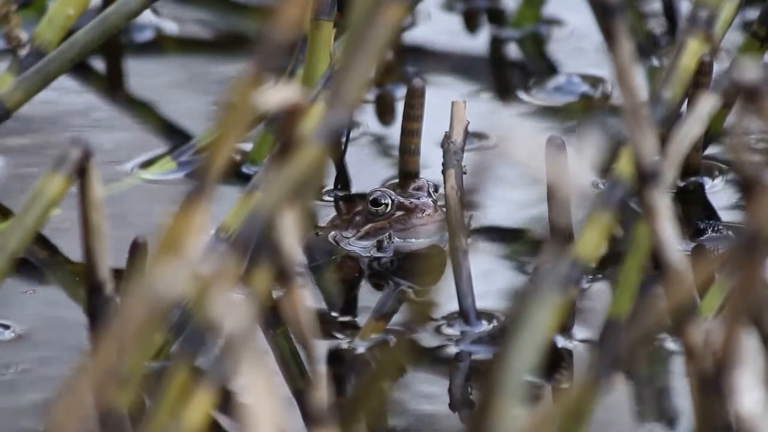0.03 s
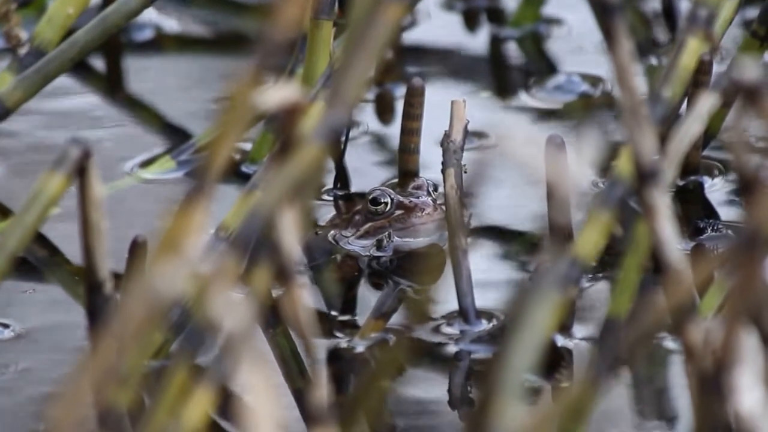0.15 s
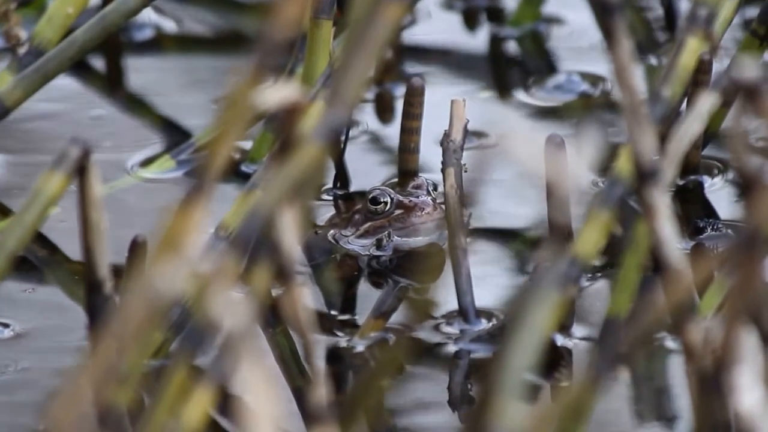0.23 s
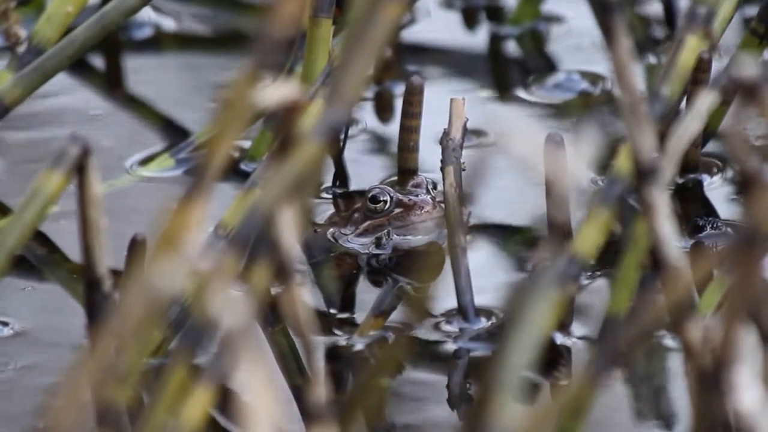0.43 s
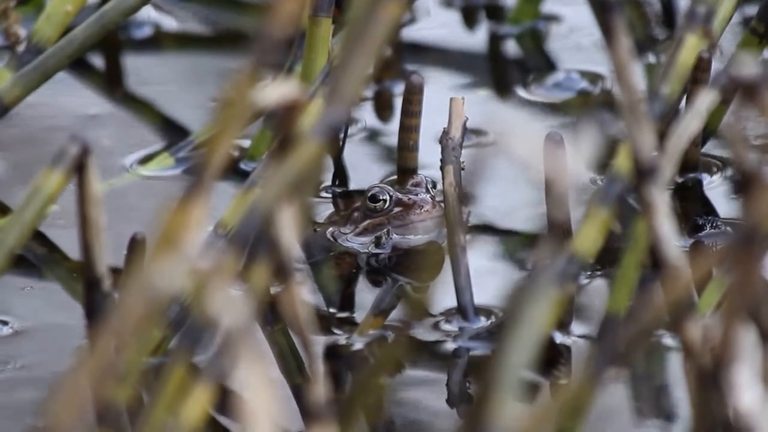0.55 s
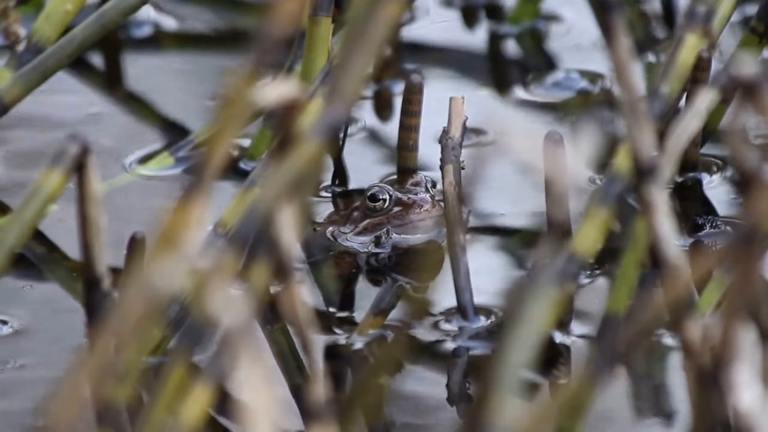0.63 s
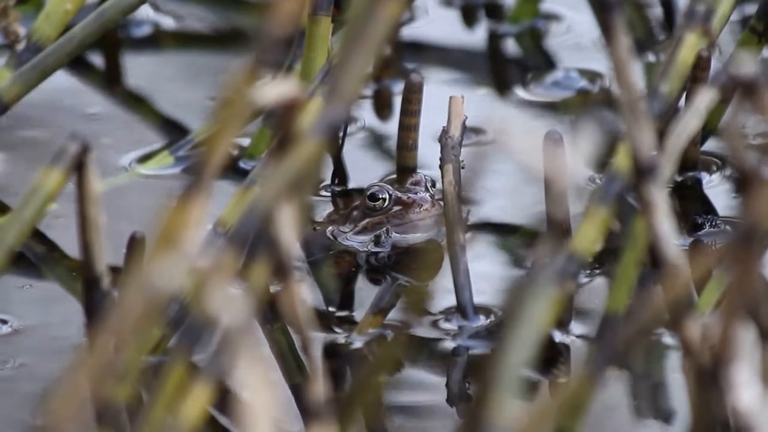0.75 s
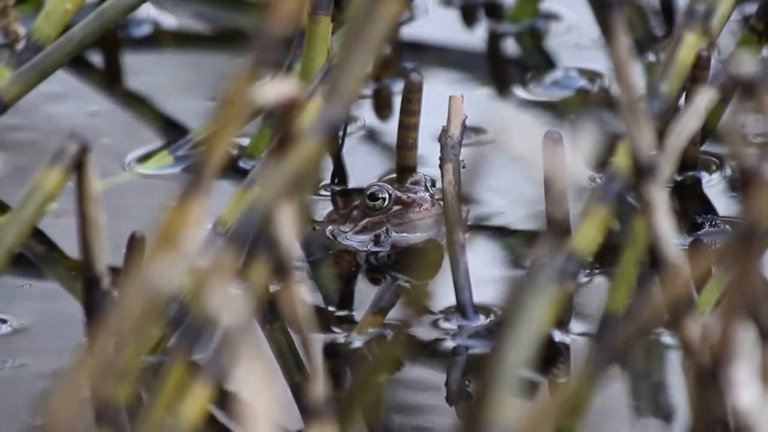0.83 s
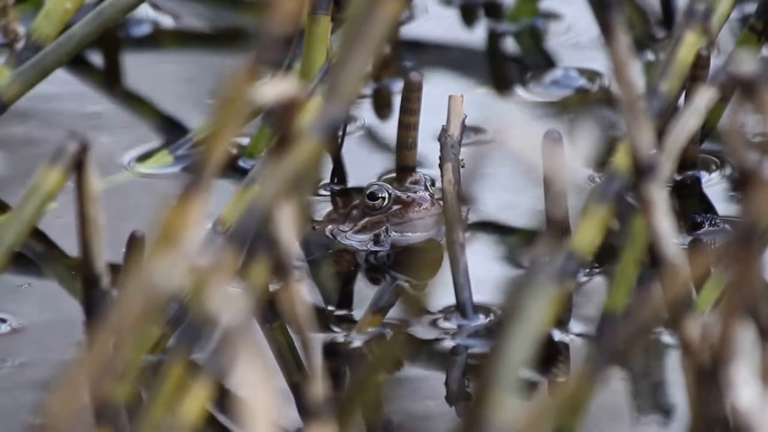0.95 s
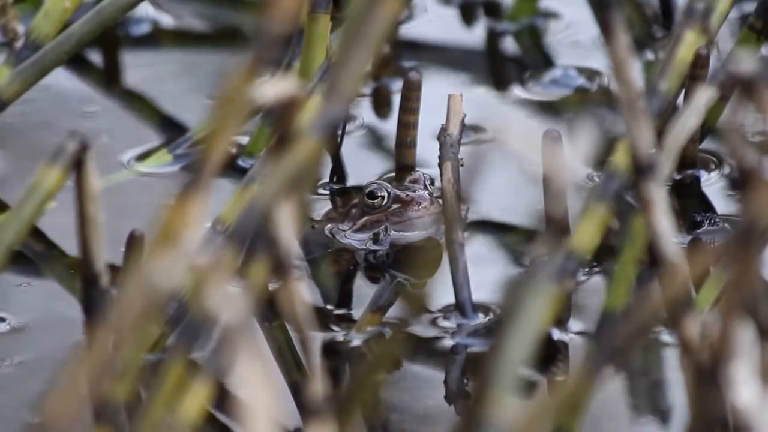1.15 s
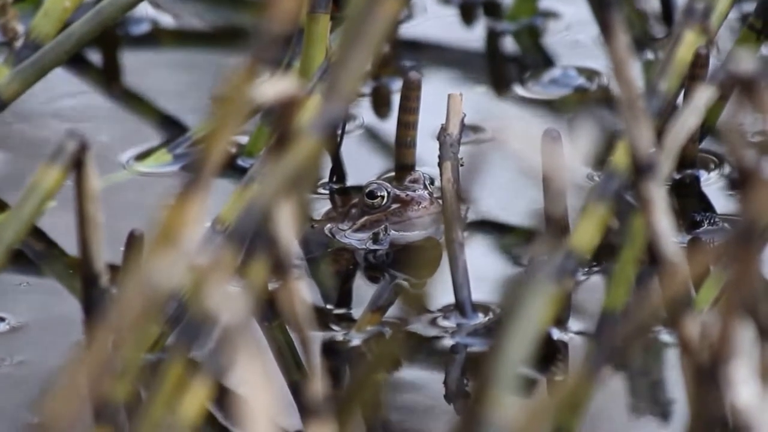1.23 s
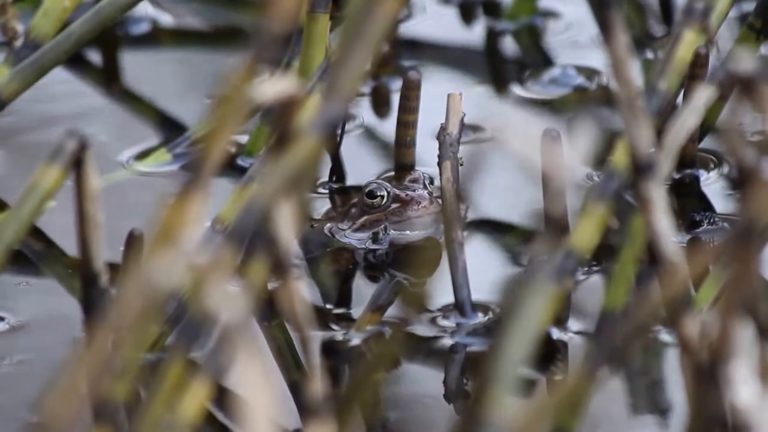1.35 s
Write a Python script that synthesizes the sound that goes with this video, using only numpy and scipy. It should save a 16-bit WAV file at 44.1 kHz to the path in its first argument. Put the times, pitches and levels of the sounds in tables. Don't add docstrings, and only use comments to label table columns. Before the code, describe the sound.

A small camera's lens drive whirrs and ticks faintly beside a still pond, with one low wind thump.

```python
import sys
import numpy as np
from scipy import signal
from scipy.fft import rfft, irfft
from scipy.io import wavfile
from scipy.ndimage import uniform_filter1d

SR = 44100
rng = np.random.default_rng(int(sys.argv[2]) if len(sys.argv) > 2 else 0)


def volts_from_db(level):
    exponent = np.asarray(level, float) / 20
    return 10 ** exponent


def dump_mix(stems):
    frames = np.atleast_2d(stems).T
    limited = np.clip(frames, -1, 1)
    pcm = np.round(limited * 32767).astype(np.int16)
    wavfile.write(sys.argv[1], SR, pcm)


N = 61739


def rms_one(x):
    return x / np.sqrt(np.mean(x ** 2) + 1e-20)


def drift(rate_hz):
    block = 40
    pole = np.exp(-2 * np.pi * rate_hz * block / SR)
    settle = 2000
    noise = rng.standard_normal(N // block + settle + 2)
    slow = signal.lfilter([1], [1, -2 * pole, pole ** 2], noise)[settle:]
    return np.interp(np.arange(N) / block, np.arange(len(slow)), rms_one(slow))


def whirr():
    # centre_hz, width_hz, level_db (rms)
    resonances = [(369.7, 116, -62.5), (450, 100, -65), (621, 140, -72), (742, 50, -71), (1180, 97, -81),
                  (1396, 278, -71), (2140, 190, -81), (2430, 134, -75), (2677, 267, -72), (3100, 440, -80),
                  (3452, 220, -78.5), (3850, 250, -88), (4420, 420, -88), (5550, 500, -93),
                  (6070, 420, -89), (6800, 330, -92), (9300, 300, -102), (12200, 370, -98),
                  (13130, 300, -96), (14200, 400, -100), (15330, 400, -94)]
    shared_db = 1.37 * drift(26)
    flicker_db, flicker_hz = 0.95, 12
    out = 0
    for centre_hz, width_hz, level_db in resonances:
        edges_hz = [centre_hz - width_hz / 2, centre_hz + width_hz / 2]
        band = signal.butter(2, edges_hz, "band", fs=SR, output="sos")
        noise = signal.sosfilt(band, rng.standard_normal(N + SR // 10))[-N:]
        gain_db = level_db + shared_db + flicker_db * drift(flicker_hz)
        out = out + volts_from_db(gain_db) * rms_one(noise)
    return out


def hiss():
    # frequency_hz, density_db (per Hz)
    spectrum = [(200, -6.5), (900, -8.5), (1800, -25), (4000, -24), (5300, -29.5), (8000, -35),
                (11500, -37), (13600, -41)]
    curve_hz, curve_db = np.transpose(spectrum)
    bin_hz = np.arange(1, N // 2 + 2) * SR / N
    shape_db = np.interp(np.log(bin_hz), np.log(curve_hz), curve_db)
    noise = irfft(rfft(rng.standard_normal(N)) * volts_from_db(shape_db), N)
    return volts_from_db(-67.5) * rms_one(noise)


def whine():
    frequency_hz, level_db = 15634.8, -61.5
    return volts_from_db(level_db) * np.sin(2 * np.pi * frequency_hz * np.arange(N) / SR)


def wind():
    # time_s, level_db
    gusts = [(0, -68), (.045, -57), (.095, -74), (.135, -57), (.21, -52), (.37, -56.5), (.392, -62.5),
             (.49, -59), (.555, -78), (.62, -66), (.75, -60.5), (.79, -68.5), (.91, -65), (1.03, -56),
             (1.085, -75), (1.19, -61), (1.29, -60), (1.35, -72)]
    # time_s, peak_db, pitch_hz, length_cycles, direction (1 sucks, -1 pushes first)
    eddies = [(.192, -41, 90, 2, 1), (0.2248, -25, 132, 1.24, -1), (.239, -32.5, 170, 1.25, -1),
              (.2473, -21.5, 165, 1.5, -1), (.2518, -32, 230, 1.2, -1), (.2478, -35, 390, 2.8, -1),
              (.247, -47, 670, 3.0, 1), (.223, -39.5, 342, 2.3, -1), (.327, -43.5, 410, 1.4, 1),
              (0.2148, -40.5, 110, 0.93, -1), (0.258, -29.5, 68, 1.5, 1), (.272, -39.5, 190, 1.6, 1),
              (0.278, -35, 220, 1.35, -1), (0.286, -28.5, 100, 1.27, -1), (.303, -35.5, 85, 1.3, -1),
              (.322, -25, 151, 1.3, 1), (0.3284, -30, 183, 1.47, 1), (.346, -44.5, 55, 1.4, 1),
              (0.361, -25.5, 157, 1.1, -1), (.361, -41, 368, 3.5, 1), (0.369, -34, 81.6, 1.14, -1),
              (.497, -53, 95, 1.2, 1), (0.751, -50.5, 90, 1.3, -1), (0.909, -48, 78, 0.88, 1),
              (1.001, -50.5, 139, 1.9, 1), (1.021, -54.5, 49, 1.2, 1), (1.213, -48.5, 450, 1.9, -1),
              (1.252, -48.5, 110, 1.24, -1), (1.291, -53, 65, 0.7, -1), (.2415, -42, 480, 2.4, -1),
              (.248, -53, 825, 3.0, 1), (.87, -56, 54.6, 1.3, 1), (.699, -60, 65, 1.5, -1),
              (.155, -51, 70, 2.3, 1), (.36, -54.5, 700, 3.5, 1), (.035, -54, 85, 1.5, 1),
              (.44, -56, 70, 1.5, 1), (.075, -54, 330, 3.0, 1), (.18, -55, 170, 1.5, 1)]
    even_s, lump_db, lump_hz = 0.05, 2.5, 25.8
    t = np.arange(N) / SR

    band = signal.butter(2, [30, 85], "band", fs=SR, output="sos")
    flutter = signal.sosfilt(band, rng.standard_normal(N + SR))[-N:]
    local_rms = np.sqrt(uniform_filter1d(flutter ** 2, int(even_s * SR)))
    flutter = flutter / local_rms * volts_from_db(lump_db * drift(lump_hz))
    gust_time_s, gust_db = np.transpose(gusts)
    flutter = flutter * volts_from_db(np.interp(t, gust_time_s, gust_db))

    thumps = 0
    for time_s, peak_db, pitch_hz, length_cycles, direction in eddies:
        after_s = t - time_s
        swell = np.exp(-(2 * after_s * pitch_hz / length_cycles) ** 2)
        wave = np.sin(2 * np.pi * pitch_hz * after_s)
        thumps = thumps + volts_from_db(peak_db) * np.sign(direction) * swell * wave
    return flutter + thumps


def step_sound(modes):
    catch_s, catch_t60_s, catch_above_hz = 0.0033, 0.009, 5400
    t = np.arange(SR // 20) / SR
    seated_s = np.maximum(t - catch_s, 0)
    out = 0
    for mode_hz, level_db, rise_s, t60_s in modes:
        loss_db = 60 * t / t60_s
        if mode_hz > catch_above_hz:
            loss_db = loss_db + 60 * seated_s / catch_t60_s
        swell = (1 - np.exp(-t / rise_s)) ** 2
        out = out + volts_from_db(level_db - loss_db) * swell * np.sin(2 * np.pi * mode_hz * t)
    return out


def lens_steps():
    # start_s, peak_db
    steps = [(.0203, -60), (.0253, -60), (.0582, -61), (.0632, -63), (.1111, -62), (.149, -62),
             (.1969, -61), (.3257, -62), (.5732, -61), (.5782, -61), (.669, -60), (.7449, -62), (.758, -63),
             (.967, -61), (1.0049, -61), (1.0428, -62), (1.1666, -60), (1.2624, -62), (.0683, -70),
             (.2727, -70), (.3416, -68), (.3564, -71), (.3993, -70), (.5372, -67), (.684, -69),
             (.8819, -72), (.9769, -69), (1.1237, -69), (1.1785, -71), (1.2084, -70), (.0957, -70),
             (.5586, -68), (.7213, -72), (.7267, -68), (1.1014, -71), (1.3399, -72), (1.3783, -72)]
    # mode_hz, level_db, rise_s, t60_s
    housing_modes = [(1160, -2.9, .00123, .056), (1410, -1.9, .0002, .021), (2030, -1.5, .0004, .035),
                     (2170, -4, .0004, .03), (2468, 20, .00127, .0077), (2737, 4.1, .00058, .036),
                     (2833, 20, .00073, .006), (2930, -9, .001, .03), (3220, 14, .00041, .0085),
                     (3430, 2.5, .0003, .024), (3720, -3, .0003, .02), (3990, -2, .0004, .022),
                     (4330, -1, .0011, .016), (4720, -8, .0003, .022), (5260, -15, .0003, .025),
                     (5480, -13, .0003, .02)]
    # mode_hz, level_db, rise_s, t60_s
    gear_modes = [(6022, 0.2, 0.00057, 0.0195), (6250, 2.0, 0.00125, 0.0145), (6850, -5.4, 0.00051, 0.0584),
                  (7929, -3.6, 0.00197, 0.01), (8341, 7.4, 0.00157, 0.003), (9300, -11.2, 8e-05, 0.0079),
                  (9900, -23, 0.0001, 0.008), (10839, -17.5, 0.0001, 0.0137),
                  (11797, -17.1, 0.00012, 0.0137), (12087, 14.4, 0.0019, 0.0036),
                  (12740, -0.7, 0.00272, 0.0068), (12950, -15, 0.0001, 0.009), (13300, -17, 0.0001, 0.008),
                  (14200, -16, 0.0001, 0.007), (11300, -17, 0.0001, 0.008), (10400, -17, 0.0001, 0.008),
                  (7200, -14, 0.0002, 0.01)]
    small_per_s, small_db, small_spread_db = 260, -83.5, 0.5
    step_gain_db, soft_below_db, soft_dull_db = 2, -65, -8

    strikes = (rng.random(N) < small_per_s / SR) * rng.choice([-1, 1], N)
    spread = np.clip(rng.standard_normal(N), -2, 2)
    strikes = strikes * volts_from_db(small_db + small_spread_db * spread)
    for start_s, peak_db in steps:
        strikes[int(start_s * SR)] = volts_from_db(peak_db + step_gain_db)
    teeth = strikes * np.where(strikes < volts_from_db(soft_below_db), volts_from_db(soft_dull_db), 1)
    housing_ring = signal.fftconvolve(strikes, step_sound(housing_modes))
    gear_ring = signal.fftconvolve(teeth, step_sound(gear_modes))
    return -(housing_ring + gear_ring)[:N]


def snaps():
    # peak_s, peak_db, pitch_hz, t60_s
    snap_events = [(.373, -67, 12400, .006), (.373, -69, 13200, .005), (.966, -57, 13600, .005),
                   (.966, -66, 14700, .008), (.966, -67, 12800, .004), (.963, -69, 15745, .06),
                   (.665, -70, 15745, .06), (1.262, -77, 15745, .05), (1.005, -78, 15745, .04),
                   (.27, -70, 15050, .04), (.1, -73, 15050, .04), (.985, -75, 12300, .008),
                   (1.292, -75, 12000, .004)]
    rise_share = 0.15
    t = np.arange(N) / SR
    out = 0
    for peak_s, peak_db, pitch_hz, t60_s in snap_events:
        after_s = t - peak_s
        slope_s = t60_s * np.where(after_s > 0, 1, rise_share)
        loss_db = 60 * np.abs(after_s) / slope_s
        out = out + volts_from_db(peak_db - loss_db) * np.sin(2 * np.pi * pitch_hz * after_s)
    return out


def birds():
    # centre_s, pitch_hz, level_db, glide_hz_per_s
    chirps = [
        (.435, 6150, -84, 4000),
        (.485, 5900, -85, 4000),
        (.518, 5850, -84, 4000),
        (.55, 6100, -88, 4000),
        (1.115, 6000, -87, 4000),
        (1.14, 6300, -87, 4000),
        (1.362, 5750, -86, -9000),
        (1.378, 5600, -84, -9000),
        (1.392, 5800, -86, -9000),
    ]
    swell_s, flutter_hz = 0.011, 150
    t = np.arange(N) / SR
    notes = 0
    for centre_s, pitch_hz, level_db, glide_hz_per_s in chirps:
        after_s = t - centre_s
        swell = np.exp(-(after_s / swell_s) ** 2)
        mean_hz = pitch_hz + glide_hz_per_s * after_s / 2
        notes = notes + volts_from_db(level_db) * swell * np.sin(2 * np.pi * mean_hz * after_s)
    return notes * (1 + np.tanh(drift(flutter_hz)))


def scene():
    return (whirr() + hiss() + whine() + wind() + lens_steps() + snaps() + birds())[None]


def low_pass(x):
    return signal.sosfilt(signal.butter(12, 16560, fs=SR, output="sos"), x)


def record(dry):
    gap_low_hz, gap_high_hz, gap_db, cutoff_hz = 14500, 15130, -13, 15850
    bin_hz = np.arange(N // 2 + 1) * SR / N
    in_gap = (bin_hz > gap_low_hz) & (bin_hz < gap_high_hz)
    shape = np.where(in_gap, volts_from_db(gap_db), 1) * (bin_hz < cutoff_hz)
    limited = irfft(rfft(dry - whine()) * shape, N) + whine()
    dither = volts_from_db(-101) * rng.standard_normal(dry.shape)
    return low_pass(limited + dither)


dry = scene()
out = record(dry)
dump_mix(out)
```